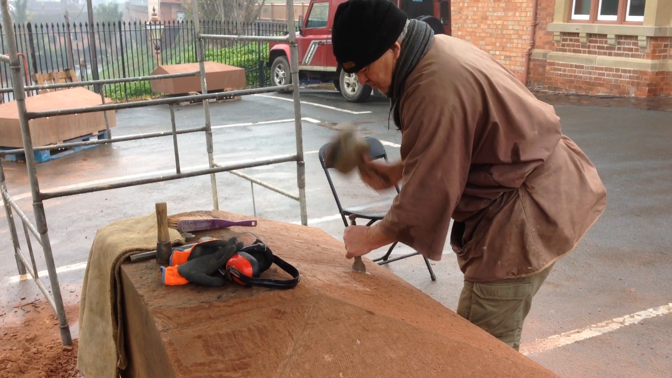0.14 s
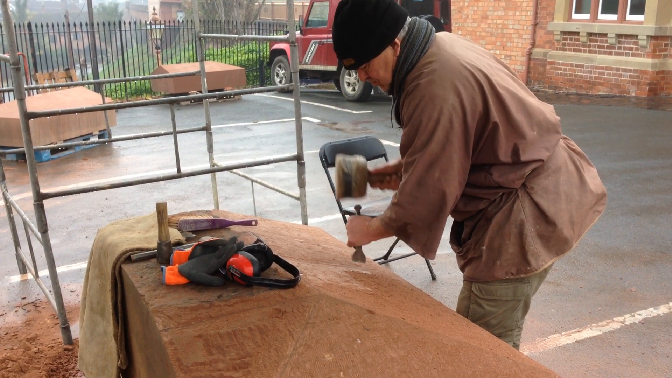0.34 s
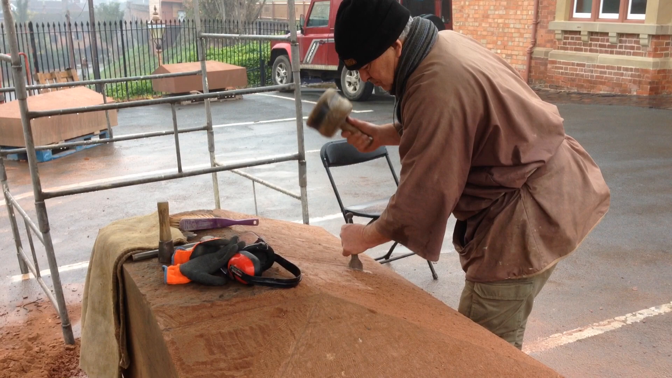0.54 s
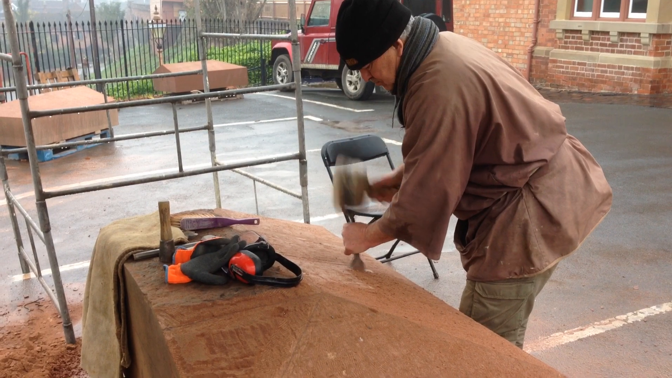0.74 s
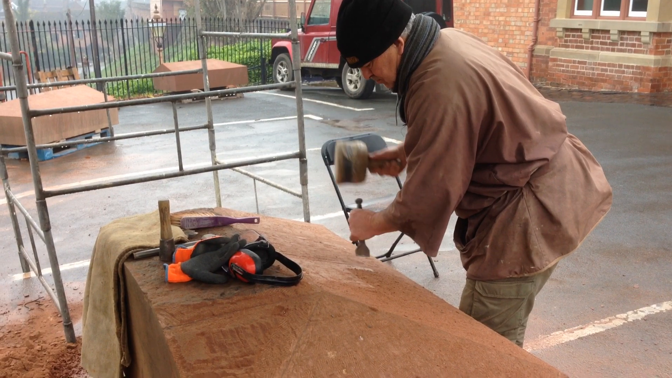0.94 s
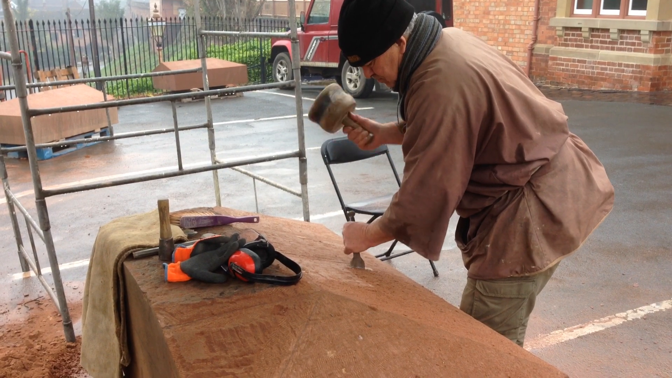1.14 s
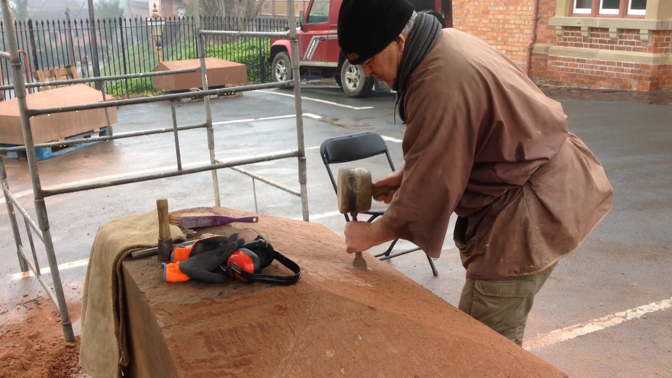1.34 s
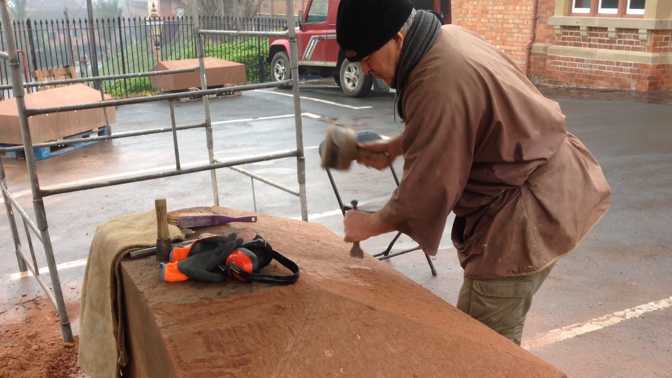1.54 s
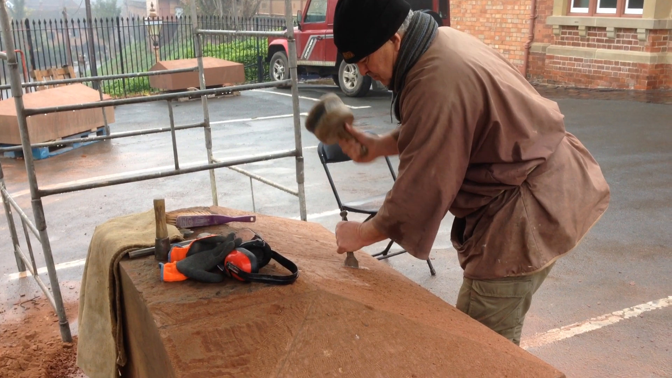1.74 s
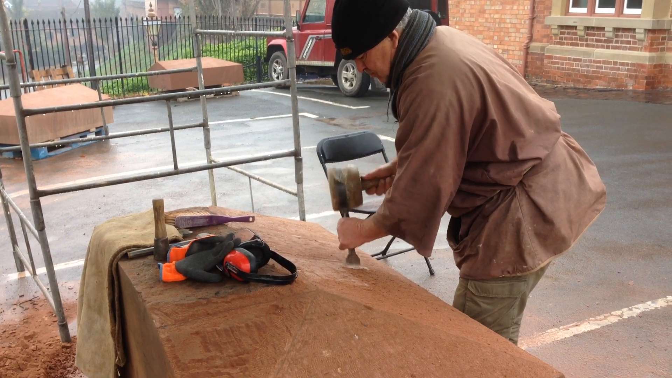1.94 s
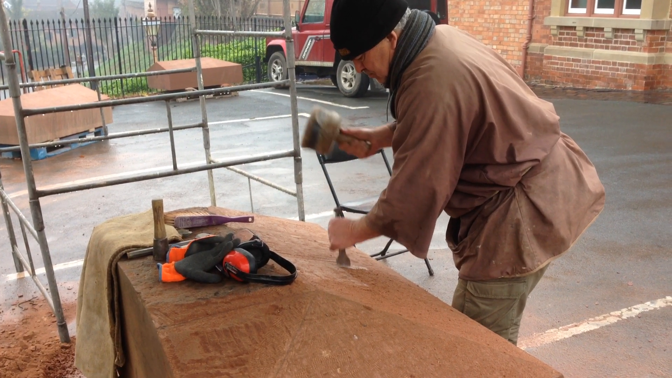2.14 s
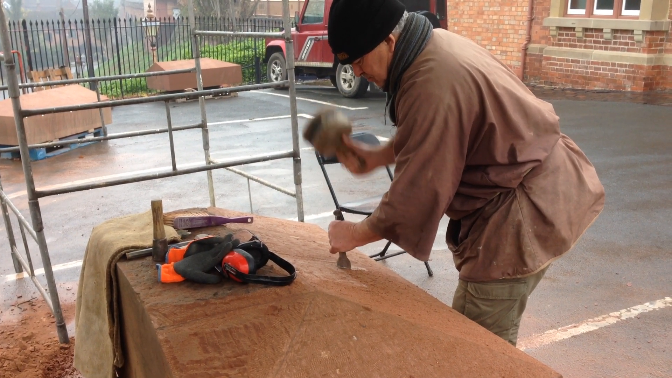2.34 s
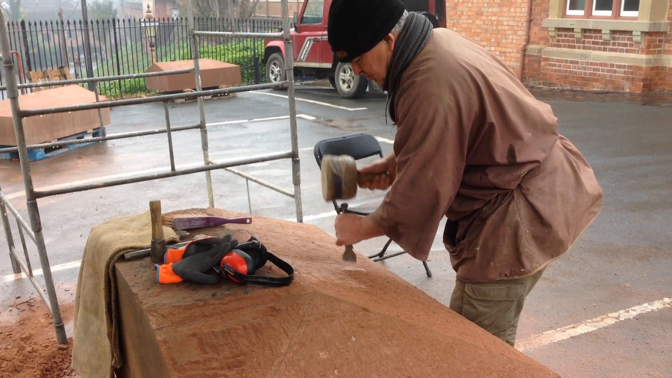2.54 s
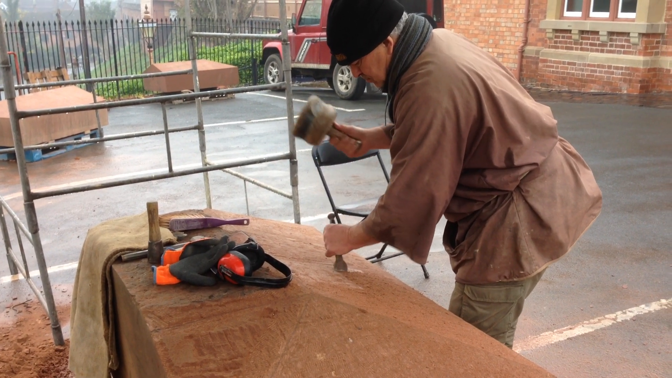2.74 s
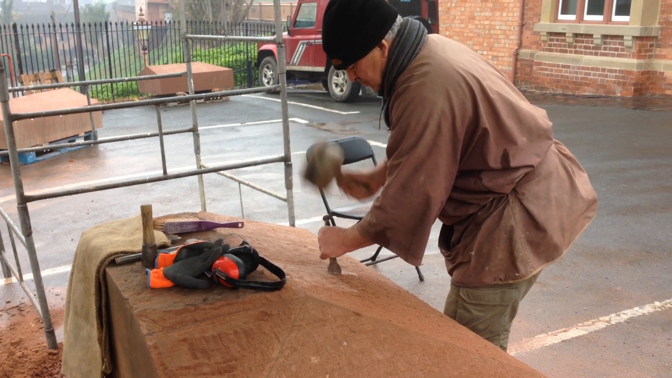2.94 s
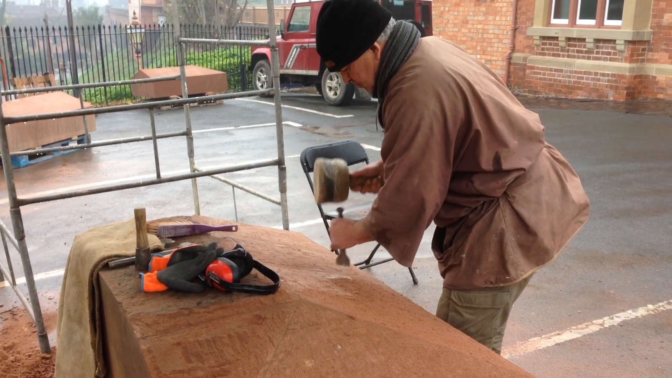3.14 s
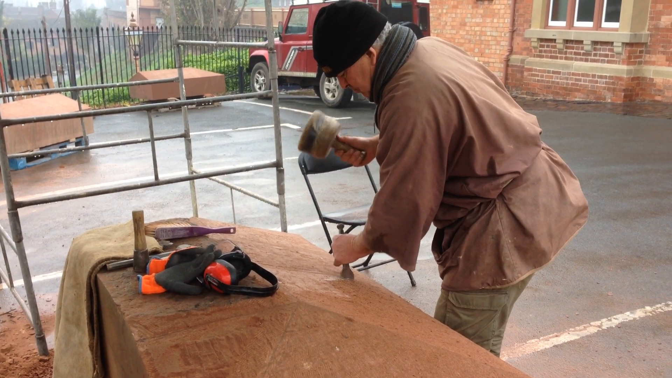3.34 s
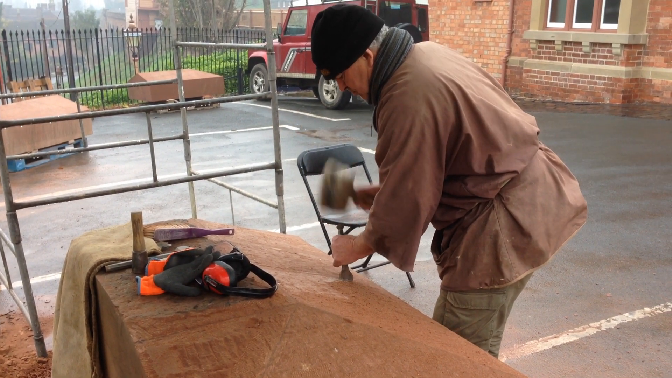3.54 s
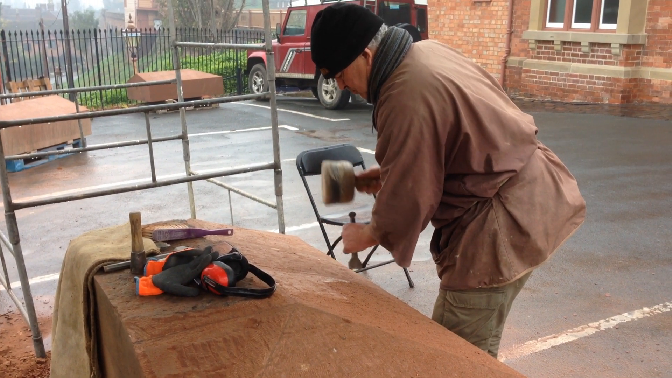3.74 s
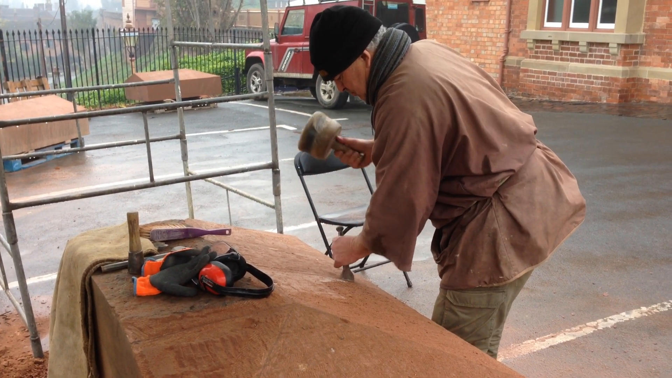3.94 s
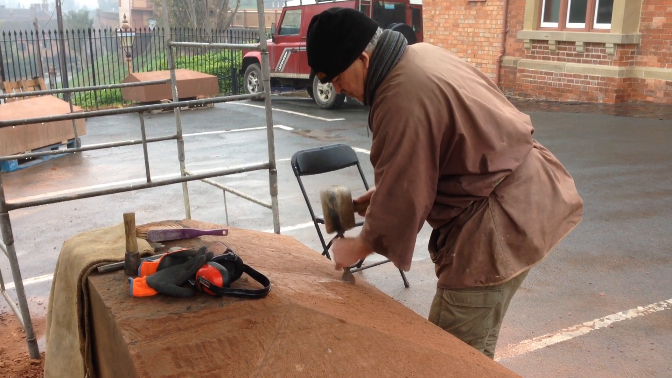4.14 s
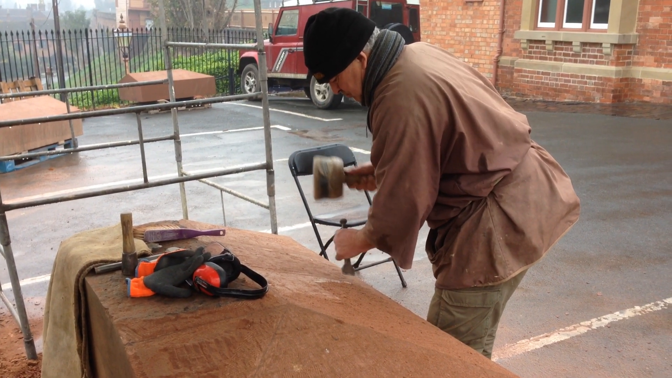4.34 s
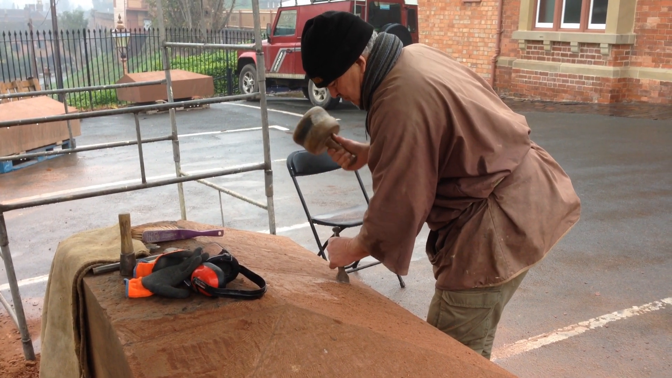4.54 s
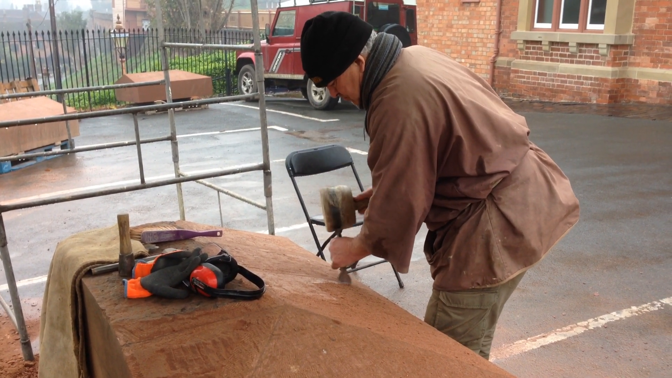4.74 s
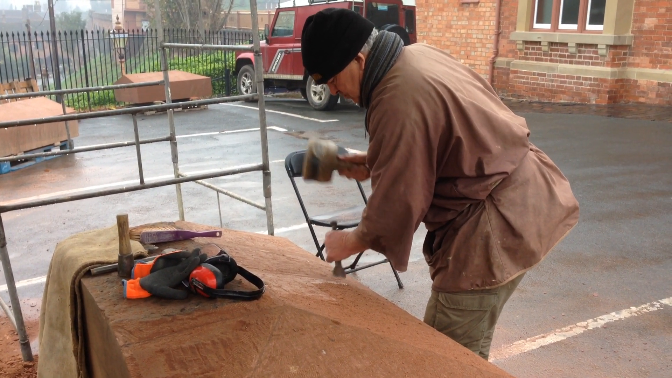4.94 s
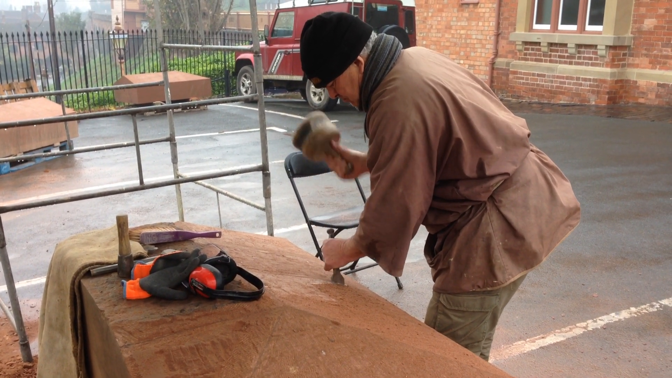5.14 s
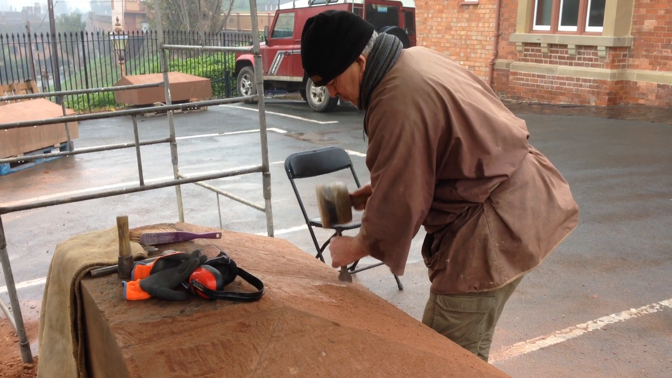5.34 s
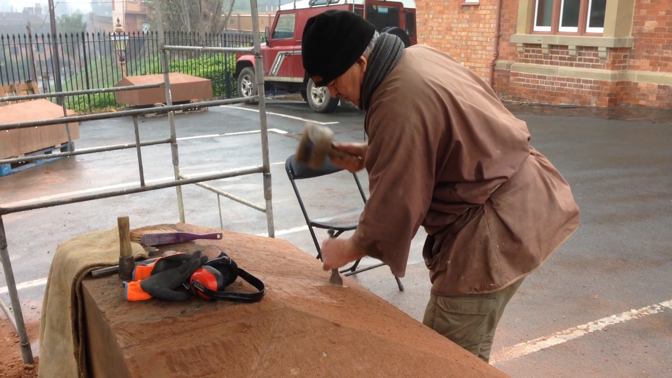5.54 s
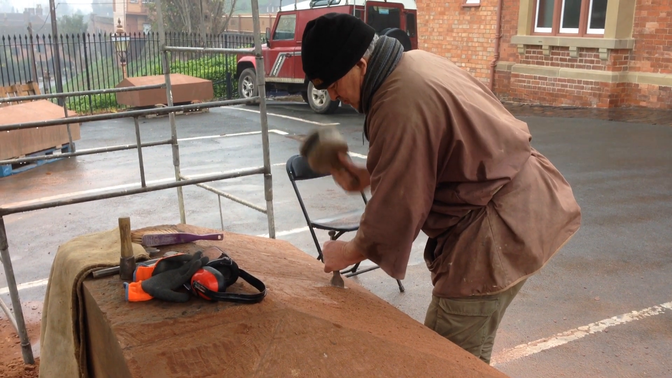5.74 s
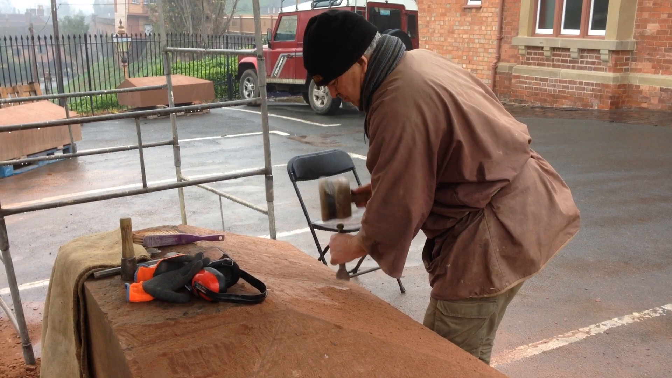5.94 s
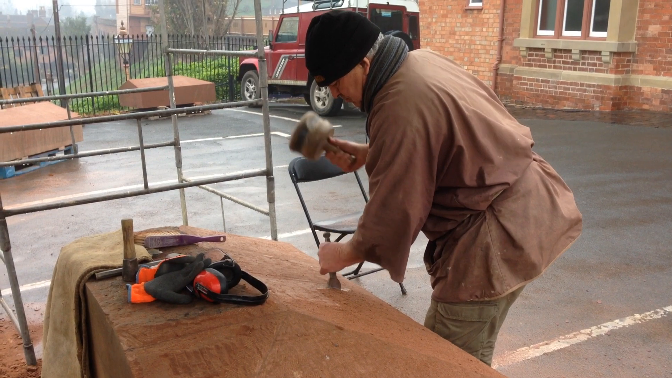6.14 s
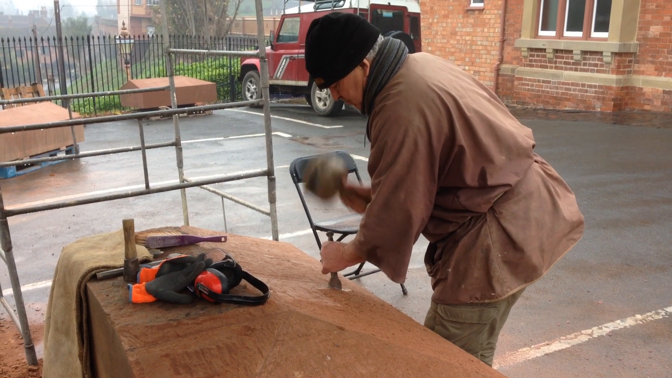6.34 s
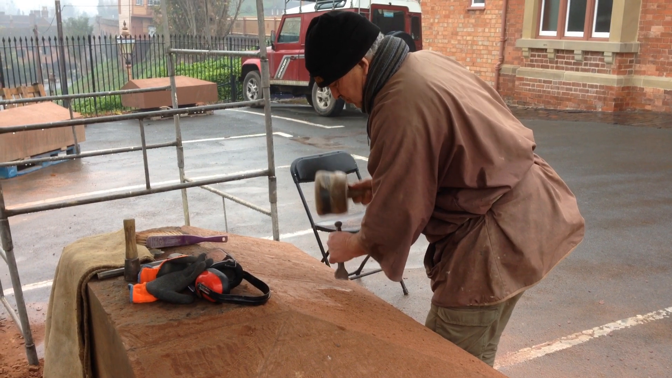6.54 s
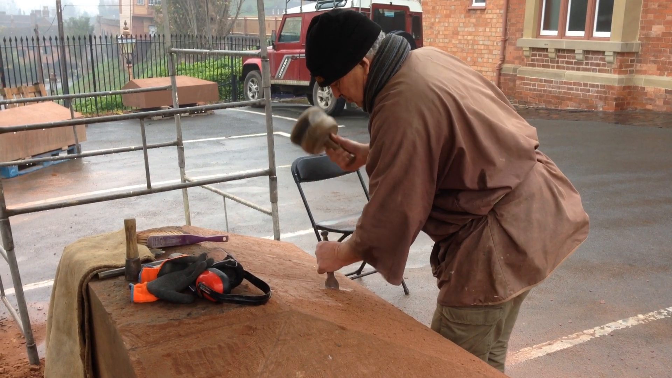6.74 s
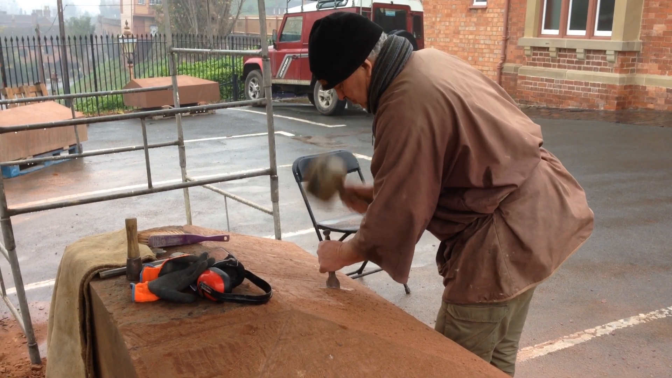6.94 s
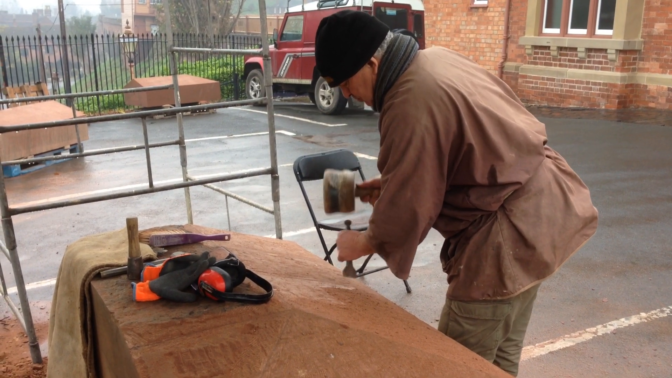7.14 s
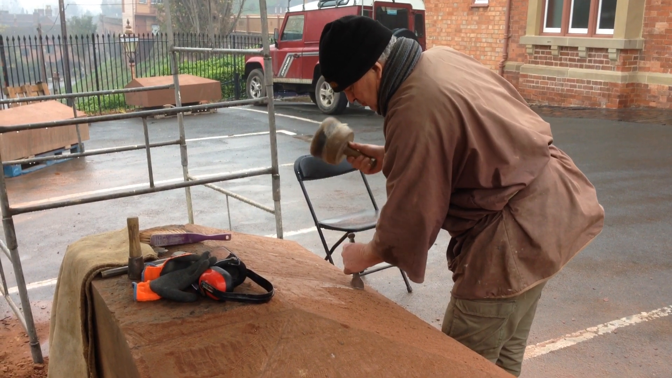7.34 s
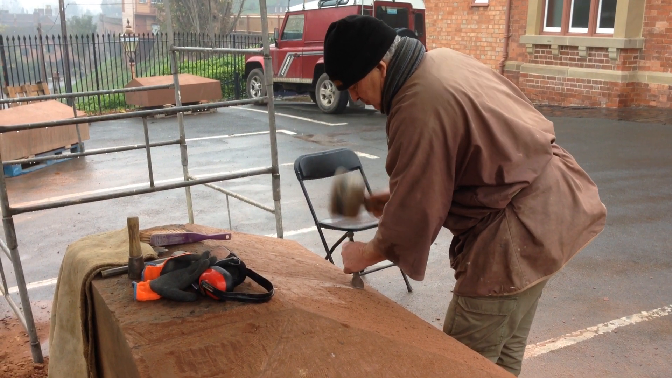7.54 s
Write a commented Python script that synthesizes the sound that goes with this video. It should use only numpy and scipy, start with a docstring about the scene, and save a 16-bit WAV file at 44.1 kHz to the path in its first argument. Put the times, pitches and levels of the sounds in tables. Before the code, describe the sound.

Evenly paced, dry, gritty mallet-and-chisel blows on stone, each preceded by a light steel clink, echo slightly off brick walls over faint distant traffic.

```python
"""A light clink of steel on stone and a brief scrape lead into mallet blows, a little under two a second.
A mason dresses a sandstone block in a yard: each blow sums decaying modes of block and hand-held chisel
with noise of crushed stone. Between blows the chisel is set back with a clink (the same modes, struck
lightly), and now and then its edge drags over grit: noise that excites the steel's resonances.
Brick walls answer blows and clinks by convolution; shaped noise makes distant traffic and one low thud."""
import sys
import numpy as np
from scipy import signal
from scipy.fft import rfft, irfft
from scipy.io import wavfile
from scipy.ndimage import map_coordinates

SR = 44100
rng = np.random.default_rng(int(sys.argv[2]) if len(sys.argv) > 2 else 0)


def generate_wav(signal):
    """Clip the signal to [-1, 1] and save it as 16-bit WAV at the path in sys.argv[1]."""
    frames = np.transpose(np.atleast_2d(signal))
    scaled = np.clip(frames, -1, 1) * 32767
    pcm = np.round(scaled).astype(np.int16)
    wavfile.write(sys.argv[1], SR, pcm)


N = 339129  # length of the scene [samples]
T = np.arange(SR // 2) / SR  # time within one sound [s]
HZ = np.fft.rfftfreq(len(T), 1 / SR)  # its frequency axis [Hz]

# modes in which block and mallet ring together: (frequency [Hz], relative level [dB], t60 [s])
BLOCK_MODES = [(227, -43.5, 0.19), (280.7, -19.5, 0.1), (333, -28, 0.13), (445, -29.5, 0.067),
               (519, -11, 0.029), (582, -14.5, 0.04), (670, -18.5, 0.068), (759.4, -27, 0.11),
               (849, -37.5, 0.13), (873, -24, 0.082), (959.5, -13, 0.048), (1029, -27, 0.055),
               (1211, -21.5, 0.053), (1333, -17, 0.042), (1485, -13, 0.028), (1890, -35.5, .05),
               (1947, -13.5, 0.028), (2160, -32.5, 0.029), (2393, -29, 0.01), (2346, -6.5, 0.012),
               (2907, -31, 0.077), (3456, -28, 0.013), (3470, -20, 0.038), (3490, -38.5, 0.05)]


def amp(db):
    """Level to amplitude ratio: 20 dB is a factor of ten."""
    return 10 ** (np.asarray(db) / 20)


def unit(x):
    """Normalisation by signal power: x at rms 1."""
    return x / np.sqrt(np.mean(x ** 2) + 1e-20)


def along(points, hz):
    """Interpolation of (frequency [Hz], value) points on a logarithmic frequency axis."""
    f, v = np.transpose(points)
    return np.interp(np.log(hz + 1), np.log(f), v)


def add(track, s, sound):
    """Linear superposition: mix a sound into the track at s seconds."""
    part = track[max(round(s * SR), 0):][:len(sound)]
    part += sound[:len(part)]


def noise(colour, size):
    """Spectral shaping: white noise weighted by a colour in dB, at rms 1."""
    spectrum = rfft(rng.standard_normal(size))
    gain = amp(along(colour, np.fft.rfftfreq(size, 1 / SR)))
    return unit(irfft(spectrum * gain, size))


def dying(x, life):
    """Frequency-dependent damping: each band of x decays with its own t60."""
    hz, t, z = signal.stft(x, SR, nperseg=128)
    decay = amp(-60 * t / along(life, hz)[:, None])
    return signal.istft(z * decay, SR, nperseg=128)[1][:len(x)]


def fade(t60):
    """Exponential decay: the level falls by 60 dB in t60 seconds."""
    return np.exp(-np.log(1000) * T / max(t60, 1e-4))


def onset(rise):
    """Exponential build-up with time constant rise in seconds."""
    return 1 - np.exp(-T / rise)


def swell(length):
    """Amplitude envelope: a quick rise to 1 at a quarter of the length, then a slower fall."""
    u = T / (length / 4)
    return np.sqrt(u * np.exp(1 - u))


def wobble(rate):
    """Slow random modulation: a smooth curve through random knots, rate of them a second."""
    knots = rng.standard_normal(int(N * rate / SR) + 4)
    return map_coordinates(knots, [np.arange(N) * rate / SR])


def blows():
    """Impact excitation: the mallet makes the block knock, the gripped steel ring and the stone crunch."""
    # (time mark [s], block level [dB], lowest chisel mode [dB], crunch [dB], chisel overtones [dB]);
    # all levels are relative to the gains below
    strikes = [(0.311, -4, -12, -16, -31.5), (0.866, -3.5, -15, -22, -28.5),
               (1.434, -2.5, -13.5, -17.5, -33.5), (1.978, -3, -45, -20, -28),
               (2.535, -5, -14.5, -13.5, -27), (3.095, -2.5, -29, -18, -32), (3.683, -3, -27, -25.5, -31),
               (4.257, -4, -12, -22, -29), (4.818, -2, -17, -18, -28), (5.374, -4, -25.5, -19, -27.5),
               (5.943, -4, -20, -14, -25), (6.503, -4, -20, -17.5, -34.5), (7.098, -4, -14, -17.5, -26)]
    knock_gain_db, ring_gain_db, overtone_gain_db, crunch_gain_db = 1, 5, 1.5, -3.5
    start_delay_s = 0.0026  # the blow starts this long after its time mark
    head_colour = [(200, -17.5), (450, 0.0), (600, 9), (1100, -4.5), (1600, -37), (3000, -42)]  # (Hz, dB)
    track = np.zeros(N)
    for s, knock_db, ring_db, crunch_db, overtone_db in strikes:
        knock = block(spread_ms=1.9, contact_hz=3500, radiate_hz=140, scatter_db=1, detune=0.006)
        # the mallet head adds a dull thud: its crowded, well-damped modes merge into noise
        head = noise(head_colour, len(T))
        knock += amp(-21) * head * fade(0.07) * onset(0.003)
        steel = chisel(ring_db + ring_gain_db, overtone_db + overtone_gain_db, grip=2.49, rise=0.00099)
        stone = crunch(crack_db=8.5, crack_t60=0.019, rise=0.001)
        blow = amp(knock_db + knock_gain_db) * knock + steel + amp(crunch_db + crunch_gain_db) * stone
        add(track, s + start_delay_s, yard(blow))
    return track


def block(spread_ms, contact_hz, radiate_hz, scatter_db, detune):
    """Modal synthesis of a knock: damped modes, dispersed, softened by contact and filtered by radiation."""
    ring = np.zeros(len(T))
    for hz, db, t60 in BLOCK_MODES:
        # high modes depend most on where the edge stands: level and pitch scatter grow with frequency
        khz = hz / 1000
        level_shift, pitch_shift = rng.standard_normal(2)
        tone = np.cos(2 * np.pi * hz * (1 + detune * khz * pitch_shift) * T)
        ring += amp(db + scatter_db * khz * level_shift) * fade(t60) * tone
    # bending waves disperse, low notes arriving later; spread_ms is the group delay at 1 kHz
    late = np.exp(-4j * np.pi * spread_ms * np.sqrt(HZ / 1000))
    contact = (1 + 1j * HZ / contact_hz) ** -2  # low-pass
    radiation = (1j * HZ / (1j * HZ + radiate_hz)) ** 3  # high-pass
    return irfft(rfft(ring) * late * contact * radiation, len(T))


def chisel(low_db, high_db, grip, rise):
    """Damped modes of a bar: a tighter grip raises, smears and shortens them, shortening the lowest most."""
    # (ungripped frequency [Hz], smear per unit of grip [Hz], relative level [dB], ungripped t60 [s])
    steel_modes = [(2095, 14.5, 3.5, 0.045), (5540, 77, -5, 0.13), (5550, 160, -3, 0.079),
                   (9715, 65, -11.5, 0.097), (10340, 140, -20, 0.12), (12010, 40, -17.5, 0.16),
                   (14600, 120, -19, 0.052)]
    stiffening = 0.00727  # share by which the modes rise per unit of grip
    low_damping, high_damping = 0.38, 0.065  # extra damping per unit of grip: lowest mode, overtones
    ring = np.zeros(len(T))
    for k, (hz, smear_hz, db, t60) in enumerate(steel_modes):
        shift, strength_db = rng.standard_normal(2)
        level_db, damping = (low_db, low_damping) if k == 0 else (high_db + strength_db, high_damping)
        # a random walk of the phase broadens the spectral line
        step = np.sqrt(2 * np.pi * abs(grip * smear_hz) / SR)
        wander = np.cumsum(rng.standard_normal(len(T))) * step
        pitch_hz = hz * (1 + stiffening * grip) + smear_hz * shift / 2
        tone = np.sin(2 * np.pi * pitch_hz * T + wander)
        ring += amp(db + level_db) * fade(t60 / (1 + abs(damping * grip))) * tone
    return ring * onset(rise)


def crunch(crack_db, crack_t60, rise):
    """Brittle fracture as noise: stone gives way with a short crack, then crumbles, treble dying first."""
    # crushed stone under the edge: (frequency [Hz], relative level [dB per Hz])
    stone_colour = [(100, -21), (500, 0.5), (1400, 5), (2400, 5), (3700, 1), (4600, -6.5), (5800, -5),
                    (7200, -15.5), (10000, -22), (13000, -22), (15500, -25)]
    # decay of the crumbling: (frequency [Hz], t60 [s])
    stone_life = [(500, 0.16), (2500, 0.096), (6000, 0.11), (14000, 0.046)]
    crumble = dying(noise(stone_colour, len(T)), stone_life)
    crack = amp(crack_db) * fade(crack_t60) * noise(stone_colour, len(T))
    return (crumble + crack) * onset(rise)


def taps():
    """Light impact: a looser grip damps the steel less; it rebounds once and nudges a low block mode."""
    # chisel set back on the stone: (time [s], lowest chisel mode [dB], knock [dB]), relative to the gains
    touches = [(0.0416, -17, -45), (0.6067, -36.5, -49.5), (1.1759, -29.5, -46.5), (1.7309, -32.5, -47.5),
               (2.2791, -28, -46), (2.84, -27.5, -44), (3.4405, -28, -41.5), (3.9851, -26, -42.5),
               (4.5483, -35, -51.5), (5.1202, -33, -44.5), (5.6788, -32.5, -43.5), (6.2443, -35.5, -45.5),
               (6.8276, -29, -41.5), (7.4318, -43, -48.5), (7.448, -42.5, -62), (7.6796, -47.5, -59.5)]
    ring_gain_db, knock_gain_db, push_gain_db = 3, 12, 11
    # overtones and crunch follow the knock: a firmer knock is brighter and grittier
    overtone_gain_db, crunch_gain_db = 5.5, -0.5
    rebound_low_db, rebound_high_db = -24.5, -12  # second touch over the first: lowest mode, overtones
    track = np.zeros(N)
    for s, ring_db, knock_db in touches:
        low_db, high_db = ring_db + ring_gain_db, knock_db + overtone_gain_db
        sound = chisel(low_db, high_db, grip=0.35, rise=0.002)
        knock = block(spread_ms=1.5, contact_hz=1100, radiate_hz=150, scatter_db=1, detune=0.005)
        sound += amp(knock_db + knock_gain_db) * knock
        # a slow push moves the block mostly in its lowest strong mode
        push = fade(0.084) * onset(0.017) * np.sin(2 * np.pi * BLOCK_MODES[1][0] * T)
        sound += amp(knock_db + push_gain_db) * push
        stone = crunch(crack_db=11.0, crack_t60=0.011, rise=0.0005)
        sound += amp(knock_db + crunch_gain_db) * stone
        rebound = chisel(low_db + rebound_low_db, high_db + rebound_high_db, grip=0.5, rise=0.001)
        add(sound, rng.uniform(0.0082, 0.05), rebound)  # the edge touches again within this span [s]
        add(track, s, yard(sound))
    return track


def drags():
    """Frictional excitation: grains catching under the sliding edge hiss and keep the steel singing."""
    # (time [s], length [s], grit level [dB], steel level [dB])
    scrapes = [(0.242, 0.12, -58.5, -54.5), (6.892, 0.072, -54, -68), (7.539, 0.11, -86.5, -65)]
    # hiss of the grains: (frequency [Hz], relative level [dB per Hz])
    grit_colour = [(200, -19), (1000, -0.5), (2500, -2.5), (5000, -9.5), (7500, -10), (11000, -19),
                   (15000, -23)]
    track = np.zeros(N)
    for s, length, grit_db, ring_db in scrapes:
        # the level jumps at random every 50 samples
        catches = amp(3 * rng.standard_normal(len(T) // 50 + 1)).repeat(50)[:len(T)]
        grains = unit(noise(grit_colour, len(T)) * catches)
        resonance = chisel(-5.5, 0, grip=0.76, rise=0.0011)
        steel = unit(signal.fftconvolve(grains, resonance)[:len(T)])
        add(track, s, swell(length) * (amp(grit_db) * grains + amp(ring_db) * steel))
    return track


def yard(x):
    """Convolution with an impulse response: near scatter, wall echoes and a faint reverberant tail."""
    # echoes from the buildings: (delay [s], level before the wall colour [dB])
    echoes = [(.058, -25), (.068, -22.5), (.123, -38.5)]
    # colour of echoes and tail: (frequency [Hz], gain [dB])
    wall_gain = [(200, -12), (500, -6), (900, 0.5), (1600, -4.5), (2400, -1.5), (6000, 0), (10000, -1.5),
                 (15000, -16)]
    # decay of the tail: (frequency [Hz], t60 [s])
    tail_life = [(200, 0.58), (800, 0.49), (2500, 0.41), (6000, 0.33), (14000, 0.029)]
    answer = np.zeros(len(T))
    for delay, db in echoes:
        mirror = unit(signal.unit_impulse(len(T)))
        scatter = unit(rng.standard_normal(len(T)) * fade(0.106))
        add(answer, delay, amp(db) * (mirror + amp(-1.0) * scatter))
    tail = dying(rng.standard_normal(len(T)), tail_life) * onset(0.037)
    answer += amp(-27) * unit(tail)
    answer = irfft(rfft(answer) * amp(along(wall_gain, HZ)), len(T))
    # the mason's body, the scaffold and the ground begin to answer after 3 ms
    near = unit(rng.standard_normal(len(T)) * fade(0.11))
    add(answer, 0.003, amp(-16.0) * near)
    # the root undoes the scaling of parts made at rms 1, so that levels compare energies
    return x + signal.fftconvolve(x, answer / np.sqrt(len(T)))[:len(T)]


def background():
    """Many distant sources sum to shaped noise: traffic, a slowly shifting rumble and one soft low thud."""
    # traffic: (frequency [Hz], relative level [dB per Hz])
    traffic_colour = [(20, -43), (45, -6), (120, -6.5), (250, -8), (500, -9.5), (900, -10), (1400, -14),
                      (2200, -16.5), (3500, -25), (5000, -27.5), (7500, -31), (10000, -39.5),
                      (15000, -44.5)]
    # rumble: (frequency [Hz], relative level [dB per Hz])
    rumble_colour = [(25, -38), (35, -22), (44, 8.5), (60, -20), (90, -1.5), (200, -19), (500, -69.5)]
    # soft low thud: (time [s], length [s], level [dB])
    thuds = [(4.847, 0.13, -48)]
    thud_colour = [(30, -12.0), (90, -7), (170, -7.0), (400, -28), (1500, -64.5)]  # (Hz, dB)
    # mean level plus slow random swing [dB]
    traffic = amp(-58 - 0.63 * wobble(5)) * noise(traffic_colour, N)
    rumble = amp(-69 + 4 * wobble(0.97)) * noise(rumble_colour, N)
    track = traffic + rumble
    for s, length, db in thuds:
        add(track, s, amp(db) * swell(length) * noise(thud_colour, len(T)))
    return track


def scene():
    """Superposition of all sources in one channel."""
    return (blows() + taps() + drags() + background())[None]


def record(dry):
    """Band limiting and soft saturation: cut the deepest bass, round tall peaks, cut the top treble."""
    low_cut_hz, top_hz = 32, 15400
    lean = signal.sosfilt(signal.butter(2, low_cut_hz, "high", fs=SR, output="sos"), dry)
    rounded = lean / (1 + (lean / 0.75) ** 4) ** 0.25  # approaches 0.75 at most
    return signal.sosfilt(signal.cheby1(12, 0.1, top_hz, fs=SR, output="sos"), rounded)


dry = scene()
out = record(dry)
generate_wav(out)
```